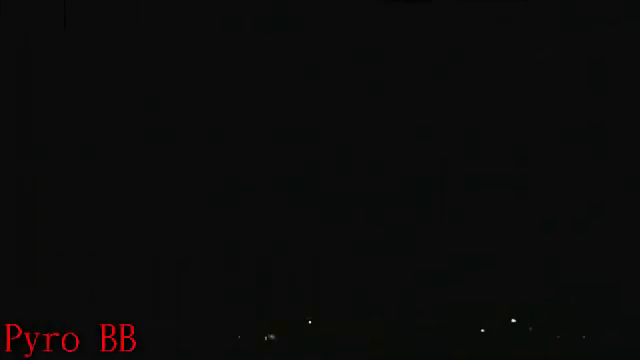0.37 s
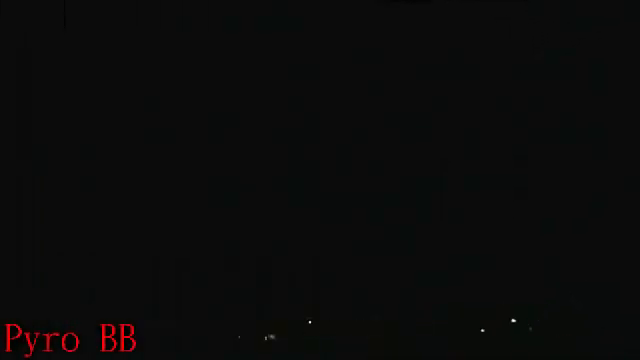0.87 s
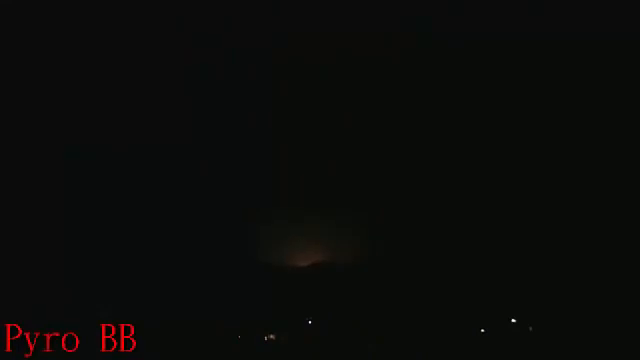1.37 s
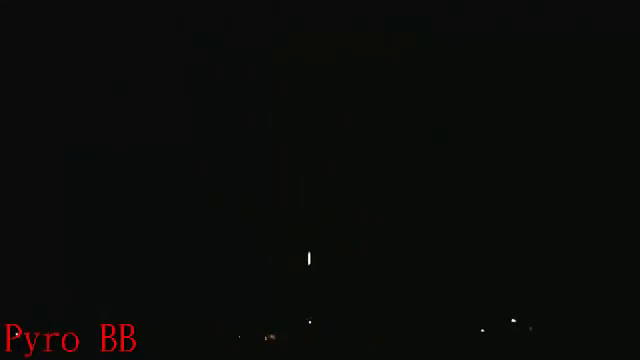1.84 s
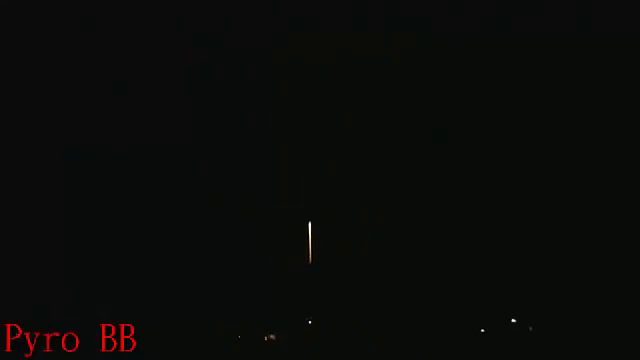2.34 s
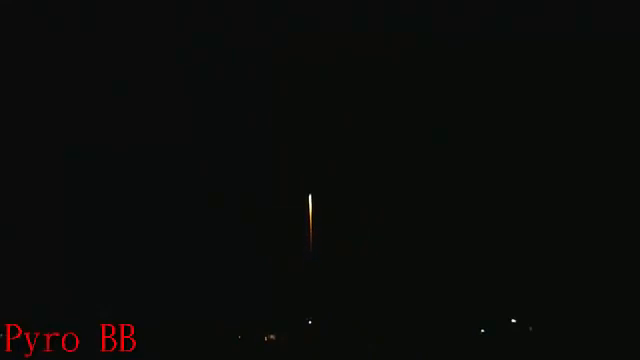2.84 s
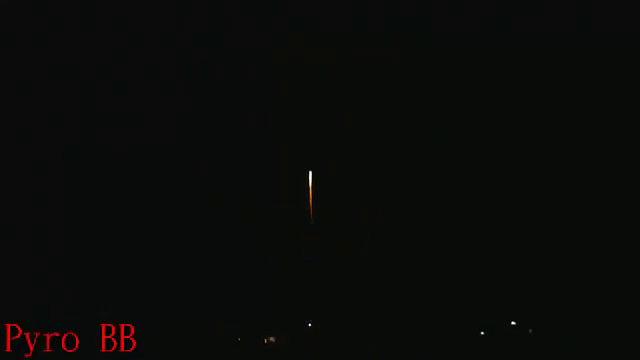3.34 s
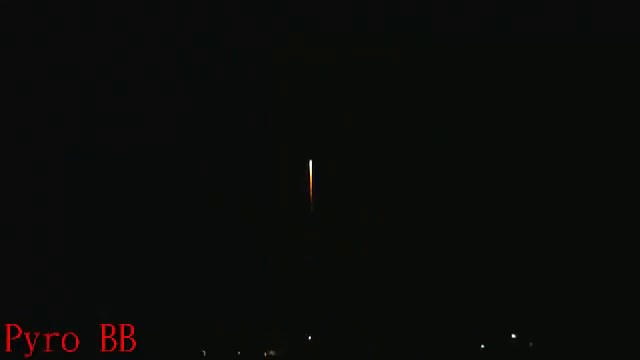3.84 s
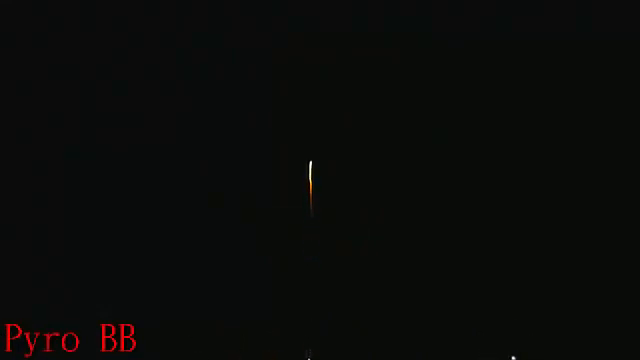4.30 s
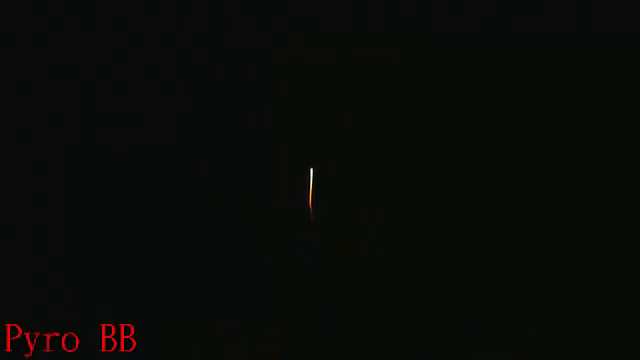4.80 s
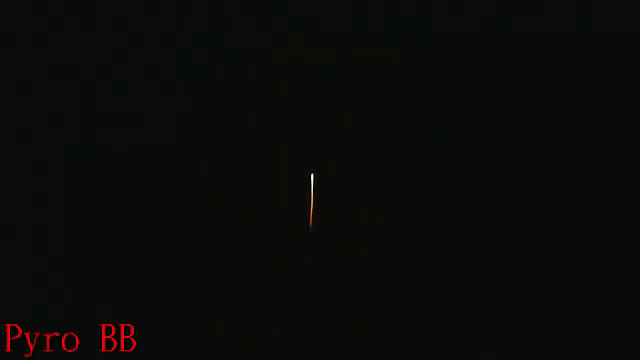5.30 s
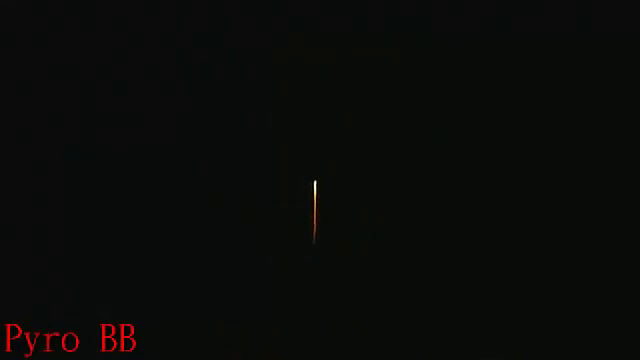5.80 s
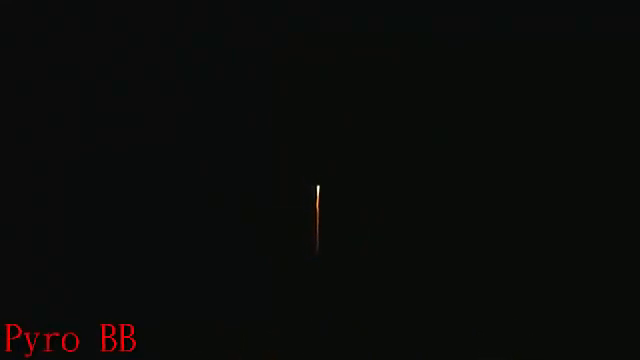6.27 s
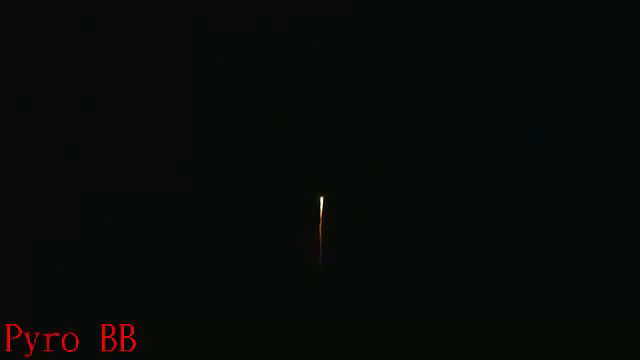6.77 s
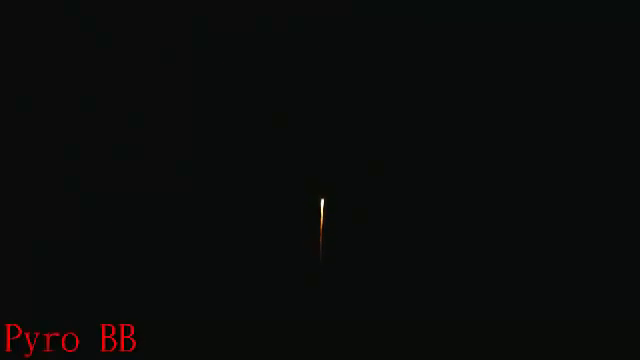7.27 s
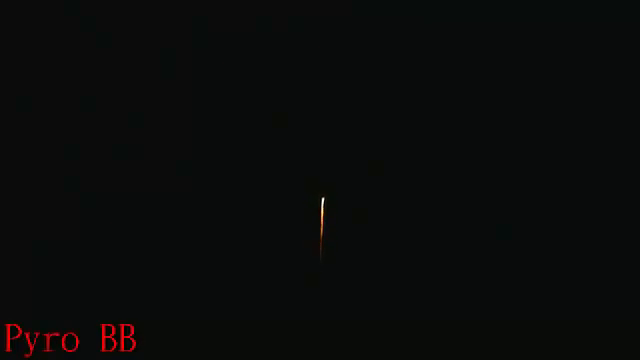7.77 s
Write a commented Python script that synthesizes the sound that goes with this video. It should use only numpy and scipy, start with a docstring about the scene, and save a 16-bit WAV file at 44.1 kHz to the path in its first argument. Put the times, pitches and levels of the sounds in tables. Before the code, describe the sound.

On open ground at night, faint crickets chirp, a clear high trill pulses in short runs and a bush cricket buzzes, over low air noise and a distant car's soft roar. Past the middle, one enormously louder mortar bang cracks with rapid wall slaps and a low thump, slightly clipping the stereo microphone. The insects hush while a dull echo rolls away, and a thin chorus partly returns.

```python
"""Open ground at night, with walls nearby: a distant mortar fires a firework shell.
An N-shaped pressure front and its slaps off the walls give way to a rolling, darkening echo of shaped noise.
Crickets chirp and trill and a bush cricket buzzes, all as gliding tone pulses over far traffic noise.
The buzz ends and the far chorus, throbbing bands of noise, drops at the bang; part of the chorus returns."""
import sys
import numpy as np
from scipy import signal
from scipy.io import wavfile
from scipy.ndimage import uniform_filter1d

SR = 44100
rng = np.random.default_rng(int(sys.argv[2]) if len(sys.argv) > 2 else 0)


def file_out(sig):
    """Save sig as 16-bit WAV at sys.argv[1]."""
    # one column per channel
    cols = np.atleast_2d(sig).T
    # limit, then scale
    lim = np.clip(cols, -1, 1)
    pcm = np.round(lim * 32767).astype(np.int16)
    wavfile.write(sys.argv[1], SR, pcm)


def volts_from_db(level):
    """Convert decibel levels to linear amplitude ratios."""
    exponent = np.asarray(level, float) / 20
    return 10 ** exponent


N = 347949

# blast front and its first echoes: t/s, level/dB, rise/ms
BLASTS = [(5.6495, -12.5, 0.27), (5.6517, 9, 0.12), (5.6577, -9.5, 0.42), (5.665, -7, 0.6),
          (5.6695, 5.5, 0.16), (5.6767, -7.5, .25), (5.6803, -5.5, 0.13), (5.686, -0.5, 0.26),
          (5.695, 1, 0.31), (5.702, -18, 0.45), (5.7112, -8, 0.81)]
# left-right likeness of the open night air: f/Hz, likeness (1 = identical)
AIR_LIKENESS = [(60, 0.88), (240, 0.75), (950, 0.64), (3770, 0.45), (15000, -0.03)]
HUSH_S = 5.66  # the insects hush
ROLL_S = 5.652  # the rolling echo sets in
CHIRP_FALL_HZ_PER_S = 11500


def read(points, hz):
    """Spectral interpolation: a curve read along a logarithmic frequency axis."""
    f, value = np.transpose(points)
    return np.interp(np.log(hz + 1), np.log(f + 1), value)


def add(mix, s, sound):
    """Superposition: a sound is summed into the mix at s seconds."""
    part = mix[..., max(round(s * SR), 0):][..., :sound.shape[-1]]
    part += sound[..., :part.shape[-1]]


def placed(x, pan_db, lag_ms=0):
    """Two-microphone localisation: a left-right level difference and a lag of the left side."""
    samples = np.arange(len(x))
    late = np.interp(samples - lag_ms * SR / 1000, samples, x)
    return np.array([late * volts_from_db(pan_db / 2), x * volts_from_db(-pan_db / 2)])


def noise(colour_db, likeness, patchy_db, lag_ms, size):
    """Filtered random noise: partly coherent stereo spectra, patchy in time and frequency, of overall rms 1."""
    hop = size // 4
    hz = np.fft.rfftfreq(size, 1 / SR)[:, None]
    t = np.arange(N // hop + 5) * hop / SR
    a, b, c, d, patches = rng.standard_normal((len(t), len(hz), 5), dtype=np.float32).T
    patches = uniform_filter1d(patches, size=5, axis=0)
    patches = uniform_filter1d(patches, size=7, axis=1)
    gain = volts_from_db(colour_db(hz, t) + 0 * t)
    gain = gain / np.sqrt((gain ** 2).sum(0))  # equal power in every frame
    gain = gain * volts_from_db(patchy_db * patches / patches.std())
    like = np.clip(read(likeness, hz), -1, 1)
    right = a + 1j * b
    left = like * right + np.sqrt(1 - like ** 2) * (c + 1j * d)
    left = left * np.exp(-2j * np.pi * hz * lag_ms / 1000)
    x = signal.istft(np.array([left, right]) * gain, nperseg=size, noverlap=size - hop)[1][:, :N]
    return x / x.std()


def band(hz, width):
    """Resonance: noise confined to one steep-sided band, partly alike at the two sides."""
    def colour_db(f, _):
        return -15 * np.log10(1 + (2 * (f - hz) / width) ** 4)
    return noise(colour_db, [(1, .4), (20000, .4)], 1.2, .09, size=2048)


def rumble():
    """Broadband ambient noise: the night air, strongest at low frequencies."""
    # spectrum: f/Hz, level/dB per Hz (relative)
    air_colour = [(12, -44), (20, 3.5), (71, -2), (238, -6), (271, -7), (343, -7), (381, -7), (878, -6),
                  (956, -2.5), (3300, -14.5), (4290, -35), (7260, -120)]
    return volts_from_db(-58.5) * noise(lambda hz, t: read(air_colour, hz), AIR_LIKENESS, 1.6, .09, size=2048)


def car():
    """Tyre-road noise: a mid-frequency roar whose level follows a far car."""
    # course of the roar: t/s, level/dB
    passage = [(0, -80), (1.3, -81), (2.1, -66.5), (3, -63), (4, -62), (4.8, -57.5), (5.6, -57),
               (7.9, -61.5)]
    # spectrum: f/Hz, level/dB per Hz (relative)
    tyre_colour = [(200, -24), (500, -15), (950, -7.5), (1400, -13), (2500, -30.5), (5000, -74)]
    s, db = np.transpose(passage)
    level = volts_from_db(np.interp(np.arange(N) / SR, s, db))
    return level * noise(lambda hz, t: read(tyre_colour, hz), AIR_LIKENESS, 3.4, 0.047, size=1024)


def hiss():
    """Microphone self-noise: a steady treble noise, weakly correlated between the sides."""
    # spectrum: f/Hz, level/dB per Hz (relative)
    hiss_colour = [(500, -62)] + [(2000, -23), (3000, -20), (5600, -0.5), (6600, -2), (10000, -10),
                                  (13500, -9.5), (16000, -54)]
    return volts_from_db(-71) * noise(lambda hz, t: read(hiss_colour, hz), [(1, .3), (20000, 0.17)], 0.84, 0, size=512)


def chorus():
    """Incoherent summation with amplitude modulation: many far insects blur into throbbing noise bands."""
    # bands: f/Hz, width/Hz, level before the bang/dB, level after/dB, level at the end/dB, throb rate/Hz
    far_bands = [(3800, 720, -66, -83.5, -74, 7), (4858, 720, -62, -74.5, -68, 30),
                 (4970, 320, -62.5, -68, -63.5, 45), (8330, 830, -68.5, -93, -80, 100)]
    out, t = np.zeros((2, N)), np.arange(N) / SR
    for hz, width, before_db, after_db, end_db, throbs in far_bands:
        throb = 1 + 0.12 * np.sin(2 * np.pi * throbs * t)
        db = np.interp(t, [HUSH_S, HUSH_S + 0.15, t[-1]], [before_db, after_db, end_db])
        out += band(hz, width) * volts_from_db(np.c_[[-.8, .8]]) * throb * volts_from_db(db)
    return out


def high_chorus():
    """Amplitude modulation: the chorus band near 7.7 kHz throbs, drops at the bang and briefly returns."""
    # returns after the bang: start t/s, end t/s, level/dB
    returns = [(6.19, 6.417, -70), (6.42, 6.72, -76.5), (7.015, 7.27, -73)]
    t = np.arange(N) / SR
    level = volts_from_db(np.interp(t, [HUSH_S, HUSH_S + .06], [-62.5, -84.5]))
    for start, end, db in returns:
        level = level + volts_from_db(db) * np.clip(np.minimum(t - start, end - t) / .04 + .5, 0, 1)
    throb = 1 + 0.2 * np.sin(2 * np.pi * 100 * t)
    return band(7704, 970) * throb * level * volts_from_db(np.c_[[-1.2, 1.2]])


def thin_tones():
    """Beating: two neighbouring pure tones, faint at first, swell after the bang and decay."""
    # partials: f/Hz, level/dB (relative)
    partials = [(7852, -7), (7882, 2)]
    floor_db, peak_db, rise_s, fall_db_per_s = -87, -73.5, 0.26, 11.5
    t = np.arange(N) / SR
    age = t - HUSH_S
    swell = np.clip(age / rise_s, 0, 1) * volts_from_db(peak_db - fall_db_per_s * abs(age))
    tones = sum(np.sqrt(2) * volts_from_db(db) * np.sin(2 * np.pi * hz * t) for hz, db in partials)
    return (volts_from_db(floor_db) + swell) * tones


def stroke(hz, fall_hz_per_s, length, edge):
    """Stridulation: one wing stroke is a linearly gliding tone pulse, rms near 1 at its height."""
    t = np.arange(round(length * SR)) / SR - length / 2
    turn = 2 * np.pi * (hz * t - fall_hz_per_s * t ** 2 / 2)
    return np.sqrt(2) * np.sin(turn) * signal.windows.tukey(len(t), edge)


def crowd():
    """Random superposition: faint chirps of many far crickets overlap out of step until the bang."""
    per_s, level_db, mean_hz, spread_hz = 28, -71.5, 3760, 150
    out = np.zeros((2, N))
    for place, wobble, shift, side in rng.standard_normal((round(per_s * HUSH_S), 4)):
        tone = stroke(mean_hz + spread_hz * shift, CHIRP_FALL_HZ_PER_S, .036, .8)
        s = (place * 1000) % (HUSH_S - .05)  # practically uniform in time
        add(out, s, placed(volts_from_db(level_db + 1.6 * wobble) * tone, 4 * side))
    return out


def steady_rows():
    """Periodic repetition: farther crickets chirp faintly in nearly even rows."""
    # rows: first t/s, last t/s, chirp rate/Hz, level/dB, f/Hz
    even_rows = [(.022, .76, 12.7, -67, 3930), (.848, 1.45, 12.6, -68, 3900), (4.18, 5.6, 12, -72, 3720),
                 (7.116, 7.85, 13, -76, 3760)]
    out = np.zeros((2, N))
    for first, last, rate, db, hz in even_rows:
        times = np.arange(first, last, 1 / rate)
        for s, (wobble, shift) in zip(times, rng.standard_normal((len(times), 2))):
            tone = volts_from_db(db + 1.8 * wobble) * stroke(hz + 50 * shift, 12000, .042, .8)
            add(out, s - .02 + .004 * shift, placed(tone, -3, 0))
    return out


def rising_call():
    """Frequency glide: one faint call rises steadily in pitch."""
    # call: t/s, level/dB, middle f/Hz, rise/(Hz/s), length/s
    s, db, hz, rise, length = (6.88, -59.5, 1570, 900, .18)
    out = np.zeros((2, N))
    add(out, s, placed(volts_from_db(db) * stroke(hz, -rise, length, 0.73), -1.1, 0.085))
    return out


def chirp(hz, length):
    """Wing resonance: a tone falls ever faster at a trembling level, with a faint third harmonic."""
    scatter_hz, bend_hz_per_s2, tremor = 30, 220000, .22
    t = np.arange(round(length * SR)) / SR - length / 2
    shift, stretch = rng.standard_normal(2)
    fall = CHIRP_FALL_HZ_PER_S * (1 + 0.068 * stretch)
    cycles = (hz + scatter_hz * shift) * t - fall * t ** 2 / 2 - bend_hz_per_s2 * t ** 3 / 3
    turn = 2 * np.pi * cycles
    shake = uniform_filter1d(rng.standard_normal(len(t)), size=200)
    level = (1 + tremor * shake / shake.std()) * signal.windows.tukey(len(t), .86)
    return np.sqrt(2) * level * (np.sin(turn) + volts_from_db(-31.0) * np.sin(3 * turn))


def near_crickets():
    """Stereo localisation: four near crickets chirp, each with its own level difference and time lag."""
    # crickets: middle f/Hz, nominal chirp length/s, first left-right level/dB, last left-right level/dB,
    # left lag/ms, chirps as (t/s, level/dB)
    singers = [ (3530, .03, 16, 2, .07, [(1.509, -65), (1.591, -60.5), (1.671, -55.5), (1.753, -53),
               (1.836, -49)]), (3640, 0.032, -12, -7.5, -0.027, [(1.926, -50.5), (2.01, -48),
               (2.093, -46.5), (2.177, -45.5), (2.259, -46)]), (3496, 0.025, -8, -8, -0.06, [(2.361, -57),
               (2.401, -56), (2.452, -54), (2.508, -52), (2.56, -54.5), (2.616, -52.5), (2.751, -54.5),
               (2.797, -53), (2.918, -55.5), (2.969, -53), (3.11, -60), (3.166, -56)]),
               (3815, .033, 5, 5, 0.108, [(3.241, -55), (3.316, -54), (3.393, -55), (3.467, -52.5),
               (3.549, -49.5), (3.634, -49), (3.714, -50.5), (3.788, -48.5), (3.87, -49.5), (3.951, -49.5),
               (4.038, -47.5)])]
    out = np.zeros((2, N))
    for hz, length, first_pan_db, last_pan_db, lag_ms, rows in singers:
        whole = 1.65 * length  # including the soft edges
        pans = np.linspace(first_pan_db, last_pan_db, len(rows))
        for (s, db), pan_db in zip(rows, pans):
            add(out, s - .44 * whole, placed(volts_from_db(db) * chirp(hz, whole), pan_db, lag_ms))
    return out


def trills():
    """Pulse train: one cricket repeats a clear tone evenly, each trill starting softly."""
    # trills: first pulse t/s, last pulse t/s
    spans = [(.046, .439), (.651, 1.104), (1.35, 1.74), (2.006, 2.17), (2.324, 2.746), (2.941, 3.333),
             (3.5, 3.824), (3.99, 4.411), (4.579, 4.937), (5.093, 5.584), (5.745, 5.787)]
    pulses_per_s, level_db, tone_hz = 30.7, -55.5, 4886
    out = np.zeros((2, N))
    for first, last in spans:
        times = np.linspace(first, last, round((last - first) * pulses_per_s) + 1)
        for k, (s, (wobble, shift)) in enumerate(zip(times, rng.standard_normal((len(times), 2)))):
            db = level_db - 8 * np.exp(-k / .7) + 1.6 * wobble
            pulse = volts_from_db(db) * stroke(tone_hz + 8 * shift, 1500, .026, .6)
            add(out, s - .0135, placed(pulse, -1.7, .165))
    return out


def buzz():
    """Rapid stridulation: a bush cricket's short high sweeps fuse into a buzz, each stretch starting softly."""
    # stretches: first stroke t/s, end t/s, wing stroke rate/Hz
    stretches = [(-.9944, .98, 87.65), (1.209, 3.49, 87.68), (3.762, 4.0, 83), (4.1645, 5.645, 87.7)]
    level_db, soft_start_db, warm_up_s = -56.5, 6, 0.26
    out = np.zeros((2, N))
    for first, end, rate in stretches:
        times = np.arange(first, end, 1 / rate)
        times = times[times >= 0]
        for s, (wobble, shift) in zip(times, rng.standard_normal((len(times), 2))):
            sweep = stroke(7520 + 70 * shift, 230000, .005, .9)
            db = level_db - soft_start_db * np.exp(-(s - first) / warm_up_s)
            add(out, s, placed(volts_from_db(db + 1.2 * wobble) * sweep, 2.6, .155))
    return out


def outdoors(x, wet_db, t60):
    """Scattering: leaves and ground add a short decaying tail, different at each side."""
    t = np.arange(SR // 5) / SR
    tail = rng.standard_normal((2, len(t))) * volts_from_db(-60 * t / t60) * (t > .002)
    tail = tail / np.linalg.norm(tail[0])
    return x + volts_from_db(wet_db) * signal.fftconvolve(x, tail, axes=1)[:, :N]


def rustles():
    """Friction noise: a tick and soft rustles are brief, wide puffs of high noise."""
    # puffs: middle t/s, level/dB, length/s
    puffs = [(5.412, -61, .008), (6.37, -65, .06), (6.74, -65, .07), (7.03, -75, .07), (7.2, -71, .09)]
    shape = np.zeros(N)
    for s, db, length in puffs:
        add(shape, s - length / 2, volts_from_db(db) * signal.windows.hann(round(length * SR)))
    # spectrum: f/Hz, level/dB per Hz (relative)
    leaves = [(1500, -30), (4500, 0), (8000, -2), (10500, -9), (13000, -24), (16000, -40)]
    return shape * noise(lambda hz, t: read(leaves, hz), [(1, .5), (20000, 0.32)], 1.9, 0, size=256)


def swells():
    """Exponential decay: two soft low noise swells far away rise quickly and fade slowly."""
    # swells: t/s, level/dB, f/Hz, width/Hz, t60/s
    low_swells = [(2.08, -58.5, 477, 400, 1.6), (2.45, -67.5, 247, 120, 3.1)]
    out, t = np.zeros((2, N)), np.arange(N) / SR
    for s, db, hz, width, t60 in low_swells:
        age = np.maximum(t - s, 0)
        out += band(hz, width) * volts_from_db(db - 60 * age / t60) * np.clip(age / 0.022, 0, 1)
    return out


def echoes(t):
    """Energy summation: the amplitude of all rolling echoes and their power-weighted mean distance."""
    # ever wider rings of the landscape: hold/s, level/dB, fall/(dB/s), distance (0 near, 1 far), its growth/(1/s)
    landscape = [(0.04, -15.5, 331, 0.11, 6), (.1, -26, 49.5, 0.096, 0.7), (.5, -42, 6, 0.66, -0.19)]
    # far slopes and buildings: t/s, level/dB, half-length/s, distance (0 near, 1 far)
    slopes = [(6.197, -42.5, .04, 0.62), (6.322, -37, 0.055, 1.22), (6.533, -43.5, 0.094, 1.32),
              (6.93, -46, 0.13, 0.61), (7.355, -50, 0.087, 0.56), (7.838, -56, 0.034, 1.5)]
    parts = []
    for hold, db, fall, far, growth in landscape:
        ring_db = db - fall * np.maximum(t - ROLL_S - hold, 0)
        parts.append((volts_from_db(ring_db) ** 2, far + growth * np.maximum(t - ROLL_S, 0)))
    for s, db, half, far in slopes:
        parts.append((volts_from_db(db) ** 2 * np.exp(-((t - s) / half) ** 2), far))
    power = sum(p for p, _ in parts)
    return np.sqrt(power), sum(p * far for p, far in parts) / power


def roll():
    """Diffuse reverberation: countless echoes arrive as noise, duller the longer their path."""
    # spectra of near and far echoes: f/Hz, level/dB per Hz (relative)
    near_colour = [(15, -41), (25, -8), (162, 1), (218, -7), (375, -2), (435, -6), (730, -4.5), (1010, -13),
                   (1320, -15), (4520, -38.5), (4980, -33), (9000, -34), (11700, -89), (19800, -120)]
    far_colour = [(15, -49), (25, -9), (43, -4.5), (184, -10), (218, 4.5), (253, -7.5), (355, 2.5),
                  (555, -8.5), (886, -11.5), (1570, -26.5), (4000, -48.5), (5200, -59), (8800, -120)]
    # left-right likeness: f/Hz, likeness (1 = identical)
    likeness = [(60, 0.9), (240, 0.93), (950, 1), (3770, 0.14), (15000, 0.18)]

    def colour_db(hz, t):
        far = np.clip(echoes(t)[1], -.6, 1.3)
        return (1 - far) * read(near_colour, hz) + far * read(far_colour, hz)
    t = np.arange(N) / SR
    rise = np.clip((t - ROLL_S) / 0.00081, 0, 1)
    tail = noise(colour_db, likeness, 1.55, 0.056, size=1024)
    return tail * echoes(t)[0] * volts_from_db(np.c_[[-.8, .8]]) * rise


def boom():
    """Modal ringing: the ground and the space between the walls decay as low tones."""
    # modes: f/Hz, level/dB, t60/s
    modes = [(45.3, -16, 0.44), (116.7, -15.5, 0.28), (169, -19, 0.29), (336.3, -14.5, 0.14)]
    out, t = np.zeros((2, N)), np.arange(SR) / SR
    for hz, db, t60 in modes:
        ring = volts_from_db(db - 60 * t / t60) * np.sin(2 * np.pi * hz * t)
        add(out, BLASTS[1][0], placed(ring, -1.7))
    return out


def bang():
    """Blast wave: each front is a sudden push, then suction; rounder fronts push longer.
    Scattering by ground and bushes near the path adds a dense crackle of small copies."""
    push_ms, push_per_rise = 0.53, 1.5
    out, t = np.zeros((2, N)), np.arange(SR // 20) / SR
    for s, db, rise_ms in BLASTS:
        u = t * 1000 / (push_ms + push_per_rise * rise_ms)  # 1 where push turns to suction
        front = (1 - u) * np.exp(-u / 1.38)
        soft = signal.windows.gaussian(SR // 200, rise_ms * SR / 2500)
        direct = np.convolve(front, soft / soft.sum())
        direct = direct[SR // 400 - round(rise_ms * SR / 1000):]  # trims the delay of the rounding
        sparse = rng.random(len(t)) < .06
        copies = rng.standard_normal((2, len(t))) * sparse * volts_from_db(-16.5 - 60 * t / .035)
        copies[1] = .9 * copies[0] + .4 * copies[1]
        add(out, s, placed(volts_from_db(db) * direct, -0.33, 0.013))
        add(out, s + 0.00102, volts_from_db(db) * signal.fftconvolve(direct[None], copies, axes=1))
    return out


def scene():
    """Linear superposition: night air, insects, and the bang with its echoes."""
    night = rumble() + car() + hiss()
    far_insects = chorus() + high_chorus() + thin_tones()
    chirping = outdoors(near_crickets() + steady_rows() + rising_call() + crowd(), -8, .12)
    singing = outdoors(trills() + buzz(), -11, .09)
    blast = roll() + boom() + bang()
    return night + far_insects + chirping + singing + rustles() + swells() + blast


def low_pass(x):
    """Removes everything above the highest recorded frequency."""
    return signal.sosfilt(signal.butter(12, 15690, fs=SR, output="sos"), x)


def record(dry):
    """High-pass filtering and clipping: the microphone drops the deepest bass and the loudest fronts clip."""
    x = signal.sosfilt(signal.butter(2, 32, "high", fs=SR, output="sos"), dry)
    return low_pass(np.clip(x, -1, 1))


dry = scene()
out = record(dry)
file_out(out)
```